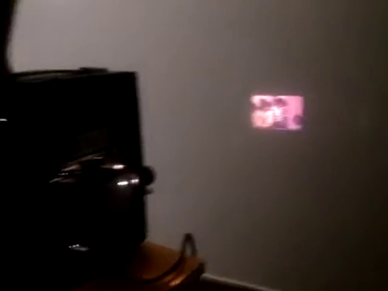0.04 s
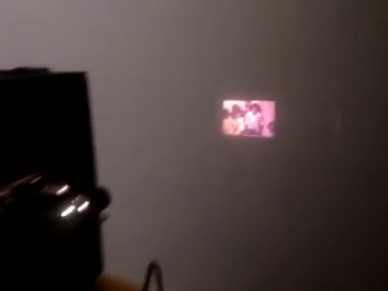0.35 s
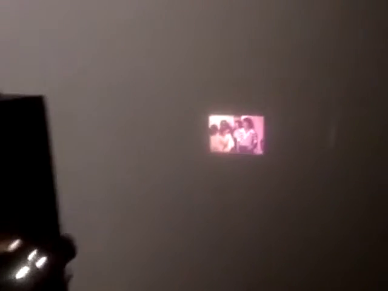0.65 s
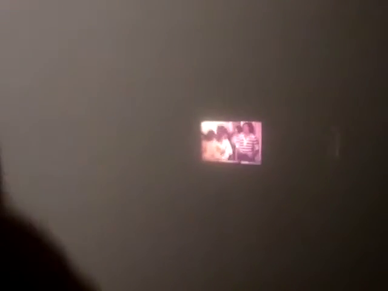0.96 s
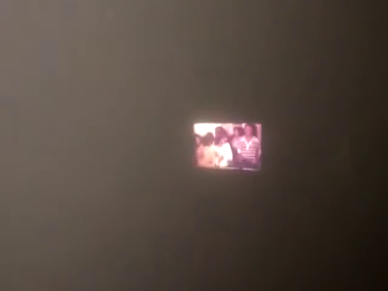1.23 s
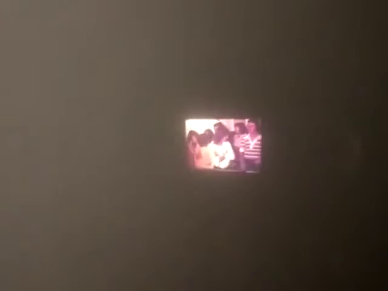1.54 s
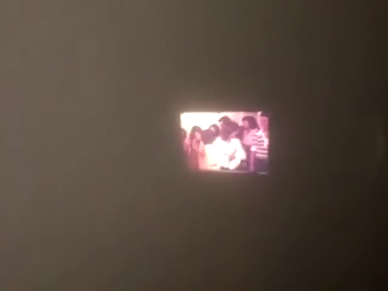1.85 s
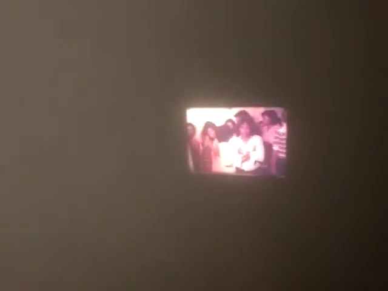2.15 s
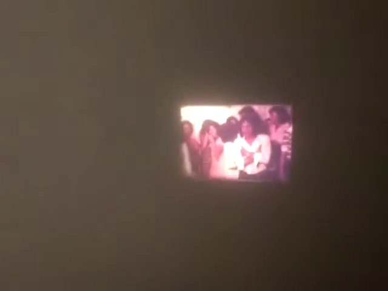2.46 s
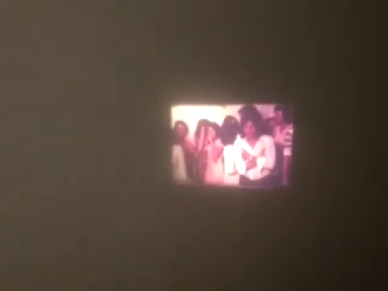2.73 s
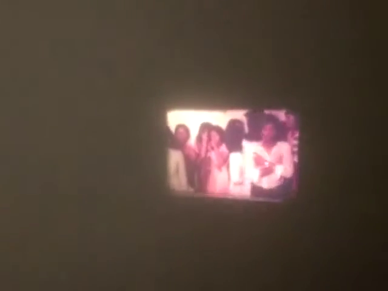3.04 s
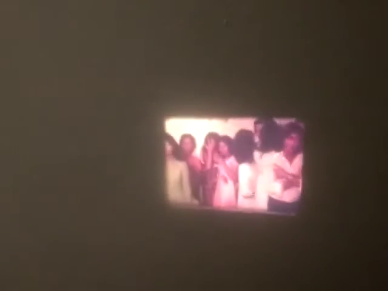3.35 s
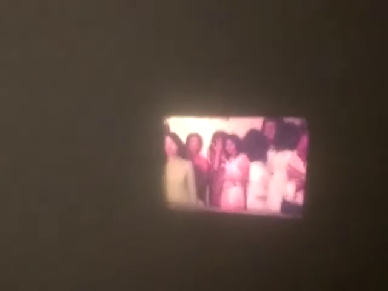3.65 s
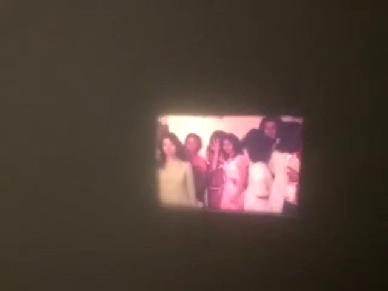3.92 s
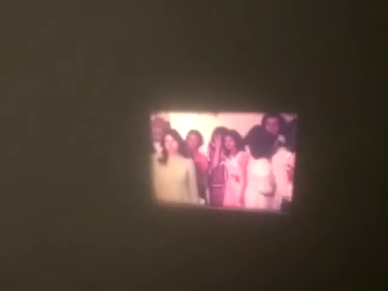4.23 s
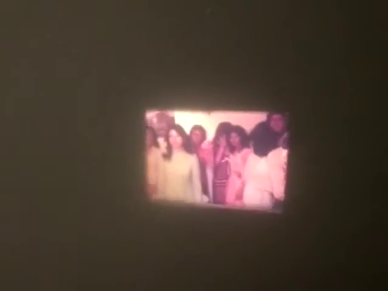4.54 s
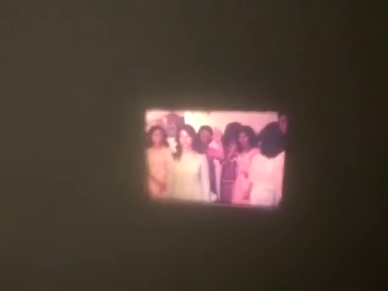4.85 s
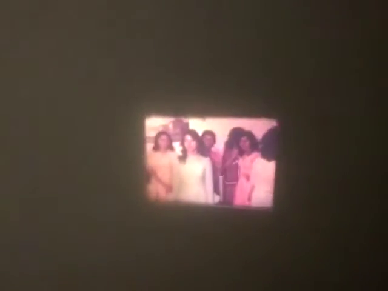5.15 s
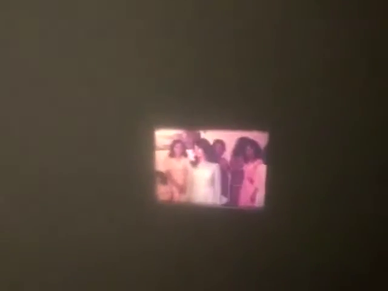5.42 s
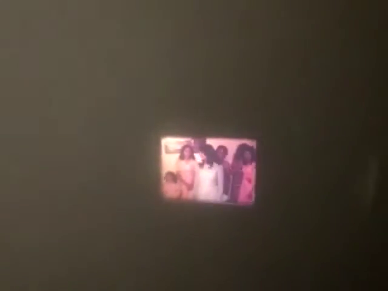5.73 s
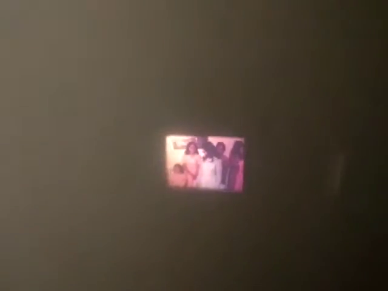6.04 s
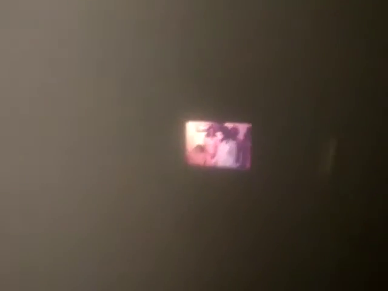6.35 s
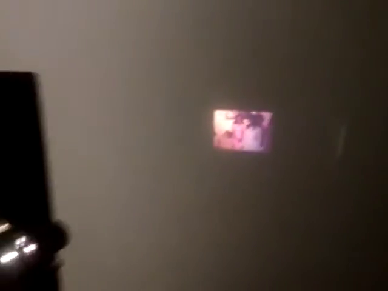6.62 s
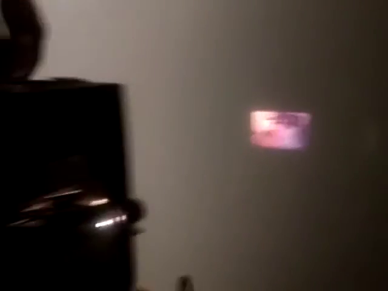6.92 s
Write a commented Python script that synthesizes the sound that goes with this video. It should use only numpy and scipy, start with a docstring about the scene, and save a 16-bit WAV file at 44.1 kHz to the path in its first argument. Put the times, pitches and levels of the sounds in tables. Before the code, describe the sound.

Rapid, regular clicking comes from an old film projector, together with fan whirr, motor drone and the crackling hiss of moving film. Now and then a perforation catches with a crisp tick. Past the middle, a reel squeals thinly and briefly. It is heard indoors through a hand-held stereo microphone that starts beside the machine, wanders off and returns, with faint dull handling thumps.

```python
"""A dark room: a small film projector runs, heard from a hand-held stereo microphone that drifts away
from it and back. The cooling fan whirrs and sings, the motor hums, the film rustles through the gate.
The claw pulls the film down some 19 times a second: each pull is a run of small contacts and a knock
that rings the housing. Now and then the claw snaps on a perforation. Two faint squeals pass, and
the hand bumps the microphone."""
import sys
import numpy as np
from scipy import signal
from scipy.fft import rfft, irfft
from scipy.io import wavfile
from scipy.ndimage import map_coordinates

SR = 44100
rng = np.random.default_rng(int(sys.argv[2]) if len(sys.argv) > 2 else 0)


def to_wav(sig):
    """Store sig (one row per channel, or 1-D mono) as 16-bit WAV at the path in sys.argv[1].

    Samples outside -1..1 are clipped; the rate is SR.
    """
    pcm = np.clip(np.atleast_2d(sig), -1, 1) * 32767
    pcm = np.round(pcm).astype(np.int16)
    wavfile.write(sys.argv[1], SR, pcm.T)  # frames by channels


N = 312228
TIME = np.arange(N) / SR
BINS_HZ = np.maximum(np.arange(N // 2 + 1) * SR / N, 1)


def from_db(db):
    """Decibels to gain."""
    return 10 ** (np.asarray(db) / 20)


def unit_rms(x):
    """Scale to rms 1."""
    return x / np.sqrt(np.mean(x ** 2) + 1e-20)


def curves(rows, at=TIME):
    """Interpolate each later column linearly against the first."""
    knots, *columns = np.transpose(rows)
    return [np.interp(at, knots, column) for column in columns]


def response(colour):
    """Gain per FFT bin from rows of freq_hz, gain_db."""
    hz, db = np.transpose(colour)
    return from_db(np.interp(np.log(BINS_HZ), np.log(hz), db))


def equalised(x, colour):
    """Filter by a gain curve."""
    return irfft(rfft(x) * response(colour), N)


def coloured(x, colour):
    """Filter by a gain curve, keeping the power of white noise."""
    return irfft(rfft(x) * unit_rms(response(colour)), N)


def resonance(x, hz, q):
    """One resonant band-pass."""
    return signal.lfilter(*signal.iirpeak(hz, q, fs=SR), x)


def noise():
    """Two channels of white noise."""
    return rng.standard_normal((2, N))


def drift(rate_hz):
    """Smooth random wander, rms 1."""
    return unit_rms(irfft(rfft(rng.standard_normal(N)) / (1 + (BINS_HZ / rate_hz) ** 2), N))


def impulses(times, sizes):
    """One impulse of the given size at each time."""
    inside = (times >= 0) & (times < (N - 1) / SR)
    return np.bincount((times[inside] * SR).astype(int), sizes[inside], N)


def decay(power, ring_s):
    """Exponential tail on impulses of power; amplitude falls to 1/e in ring_s."""
    return signal.lfilter([1], [1, -np.exp(-2 / (ring_s * SR))], power + 1e-18)


def mode(strikes, hz, t60_s):
    """A struck, decaying mode."""
    radius = np.exp(-np.log(1000) / (t60_s * SR))
    angle = 2 * np.pi * hz / SR
    return signal.lfilter([0, np.sin(angle)], [1, -2 * radius * np.cos(angle), radius ** 2], strikes + 1e-18)


# microphone ports: freq_hz, left_minus_right_db, left_lead_rad, coherence
PORTS = [(60, 1.1, -2.5, .8), (150, 1.2, -2.6, .55), (300, 2.2, -1, .55), (650, 3.2, 0, .83),
         (1150, 0, 0, .93), (1450, 0, .4, .3), (1700, 0, 2.8, .7), (2000, 0, 3.1, .99),
         (2250, 0, 3.17, .996), (2500, 0, 2.4, .45), (2800, 0, .2, .7), (3400, -1, -.2, .84),
         (3800, -.8, -1.6, .5), (4300, -.8, -3.1, .84), (4800, .4, -4, .3), (5100, 1.1, -6.4, .5),
         (5700, 2.1, -6, .6), (6500, 4.5, -3.2, .68), (8700, 12.3, 3, .47), (11000, 13.6, 9, .1),
         (15000, 12.6, 20, .05)]
def ports(pair):
    """The right port hears part of the left port's sound, shifted in phase, and part of its own."""
    balance_db, lead_rad, coherence = curves(PORTS, BINS_HZ)
    shared, own = rfft(pair)
    blend = coherence * shared + np.sqrt(1 - coherence ** 2) * own
    right = blend * from_db(-balance_db) * np.exp(-1j * lead_rad)
    return np.array([pair[0], irfft(right, N)])


# room resonances: freq_hz, centre_place, reach_place, gain_db
ROOM_PEAKS = [(302, 0.28, 0.086, 4.5), (310, 0.92, 0.041, 1), (690, 0.88, 0.22, 1), (814, 0.88, 0.41, 2),
              (866, 0.56, 0.061, 1.5), (1600, 0.43, 0.093, -0.5)]
def room_peaks(x, place, q=11.5):
    """Each room resonance takes effect as the microphone nears its place."""
    return x + sum((from_db(db * np.exp(-((place - centre) / reach) ** 2)) - 1) * resonance(x, hz, q)
                   for hz, centre, reach, db in ROOM_PEAKS)


def table_echo(x, place, near_s=0.000865, far_s=0.0024, echo_db=-23):
    """A reflection off the table combs the treble; the comb slides as the microphone moves."""
    delay_s = near_s + (far_s - near_s) * place
    echo = np.array([map_coordinates(side, [(TIME - delay_s) * SR], order=3) for side in x])
    return (x + from_db(echo_db) * echo) / np.sqrt(1 + from_db(echo_db) ** 2)


# hand bumps: start_s, level_db
BUMPS = [(.13, -46), (0.191, -49), (.26, -45), (2.78, -51), (4.325, -51), (5.08, -52), (5.349, -49),
         (5.84, -49), (6.481, -48)]
def handling(pitch_hz=62, t60_s=0.38, gain_db=3):
    """Dull thumps through the body of the microphone."""
    start_s, db = np.transpose(BUMPS)
    thumps = mode(impulses(start_s, from_db(db + gain_db)), pitch_hz, t60_s)
    return signal.sosfilt(signal.butter(2, [48, 90], "band", fs=SR, output="sos"), thumps)


# one glide per squeal: time_s, pitch_hz, level_db
SQUEALS = [
    [(5.1, 950, -44), (5.2, 958, -39), (5.29, 964, -34), (5.36, 972, -43), (5.42, 984, -37),
     (5.5, 1005, -52)],
    [(5.2, 596, -35), (5.31, 602, -42), (5.45, 604, -33.5), (5.56, 600, -37.5), (5.75, 599, -48),
     (5.95, 586, -42)],
]
def squeals(waver_hz=7, gain_db=-3):
    """Thin, unsteady tones, as from a rubbing reel."""
    out = np.zeros(N)
    for glide in SQUEALS:
        hz, db = curves(glide)
        sounding = (TIME > glide[0][0]) & (TIME < glide[-1][0])
        phase = 2 * np.pi * np.cumsum(hz + waver_hz * drift(22)) / SR
        out += sounding * np.sqrt(2) * from_db(db + gain_db) * np.sin(phase)
    return out


# motor and gear drone: freq_hz, density_db
DRONE_COLOUR = [(25, -34), (42, -40), (58, -2.5), (80, -3), (110, 1), (150, -4.5), (195, 6.5), (240, 1),
                (400, -33)]
def motor(rumble_db=4, hum_hz=119.2, hum_db=-9, sway_db=2.5, right_db=-7):
    """The drive rumbles through the table, with mains hum in it."""
    hum = np.sqrt(2) * from_db(hum_db + sway_db * drift(5.1)) * np.sin(2 * np.pi * hum_hz * TIME)
    rumble = from_db(rumble_db) * ports(coloured(noise(), DRONE_COLOUR))
    return rumble + np.array([hum, from_db(right_db) * hum])


# blade tone in the standing waves: time_s, left_db, right_db
FAN_LEVEL = [(0, -36, -34), (.25, -35, -34), (.6, -41.5, -38.5), (.87, -37.5, -40), (1.1, -42, -46),
             (1.4, -34, -43), (1.85, -34, -40), (2.35, -36, -44), (2.75, -42.5, -48), (3.5, -37, -60),
             (3.75, -43, -57), (4.15, -38.5, -60), (4.5, -44.5, -56), (4.95, -36, -52), (5.3, -42.5, -53),
             (5.6, -34.5, -43), (6, -33.5, -43), (6.5, -34, -39.5), (6.8, -37.5, -37), (7.08, -38, -36)]
def fan(octave_db, blade_hz=220, waver_hz=0.62, lead_rad=1.59, sway_db=1.2, throb_db=3.5, fourth_db=-10):
    """Blade-pass tone and throbbing overtones; standing waves make the tone differ at the two ports."""
    phase = 2 * np.pi * np.cumsum(blade_hz + waver_hz * drift(7.7)) / SR
    blade = from_db(np.array(curves(FAN_LEVEL)) + sway_db * drift(3.9)) * np.sin([phase, phase + lead_rad])
    overtones = np.sin(2 * phase) + from_db(fourth_db) * np.sin(4 * phase)
    throb = from_db(octave_db + throb_db * drift(16))
    return np.sqrt(2) * (blade + throb * overtones)


# air and gear noise: freq_hz, density_db
WHIRR_COLOUR = [(40, -53), (140, -16.5), (200, 0), (245, -3.5), (320, 0), (480, -1), (700, -2.5), (920, -5),
                (1070, -3), (1350, -11), (1650, -18.5), (2200, -29.5)]
def whirr(pulls, gain_db=-1, load_db=-0.5, load_s=0.033):
    """Fan air and gear rumble, dipping slightly under the load of each pull."""
    load = decay(impulses(pulls, np.ones(len(pulls))), load_s)
    return from_db(gain_db + load_db * unit_rms(load - load.mean())) * coloured(noise(), WHIRR_COLOUR)


# film on its guides: centre_s, half_width_s, freq_hz, level_db
BRUSHES = [(0.906, 0.036, 7600, -37), (0.633, 0.18, 8000, -48), (3.885, 0.11, 3160, -50),
           (4, 0.085, 3200, -46), (5.9, 0.39, 12700, -55), (6.327, .04, 12500, -41)]
def brushes(q=4):
    """The film brushes its guides: short swells of hiss, each through one resonance."""
    out = np.zeros((2, N))
    for centre_s, half_width_s, hz, db in BRUSHES:
        swell = np.exp(-((TIME - centre_s) / half_width_s) ** 2)
        out += from_db(db) * swell * unit_rms(resonance(noise(), hz, q))
    return out


# film rustle: freq_hz, density_db
RUSTLE_COLOUR = [(1000, -9), (1400, -4), (1650, 5), (2150, 0), (2800, 0.5), (4000, 4), (5200, 0.5),
                 (6400, -2.5), (8200, -0.5), (10000, -7.5), (12000, -16), (15000, -26)]
# rustle level, also followed by metal and clatter: time_s, level_db
TREBLE_LEVEL = [(0.0, -37.5), (0.39, -38), (0.61, -42), (0.93, -39), (0.97, -42.5), (1.24, -42),
                (1.46, -37.5), (2.13, -36), (2.58, -39.5), (3.04, -39.5), (3.43, -36), (3.59, -38),
                (3.615, -40), (3.8, -41.5), (4.14, -38.5), (4.31, -39), (4.34, -41.5), (4.55, -39.5),
                (4.73, -38), (5.3, -39), (5.7, -36.5), (6.43, -35.5), (6.8, -38), (6.9, -40), (7.08, -38.5)]
USUAL_TREBLE_DB = -38
def film(treble_db, gain_db=0.6, flutter_db=2.5, crackles_per_s=55, crackle_s=0.00036, spread_db=1):
    """The film hisses through the gate; its loops crackle at random."""
    sizes = from_db(spread_db * np.minimum(rng.exponential(1, N), 4))
    onsets = rng.random(N) < crackles_per_s / SR
    crackles = decay(onsets * sizes ** 2, crackle_s)
    envelope = from_db(treble_db + gain_db + flutter_db * drift(71)) * np.sqrt(1 + crackles)
    return coloured(envelope * noise(), [(300, -45)] + list(RUSTLE_COLOUR))


# drive knocks per frame: delay_s, freq_hz, level_db, ring_s
KNOCKS = [(-.003, 1080, -16, 0.0046), (.004, 316.5, -10, 0.015), (0.026, 340, -10.5, .008)]
def knocks(pulls, q=3, uneven_db=3.6):
    """The drive knocks dully on each of its parts once a frame."""
    out = np.zeros((2, N))
    for delay_s, hz, db, ring_s in KNOCKS:
        sizes = from_db(uneven_db * rng.standard_normal(len(pulls)))
        bursts = np.sqrt(decay(impulses(pulls + delay_s, sizes ** 2), ring_s)) * noise()
        out += from_db(db) * unit_rms(resonance(resonance(bursts, hz, q), hz, q))
    return out


# case thumps per pull: delay_s, level_db, ring_s
THUDS = [(.003, -1.5, 0.0034), (.0098, 2, 0.012)]
# hollow throb: time_s, level_re_whirr_db
THUD_LEVEL = [(0, -6), (.7, -5), (1.4, -11), (2, -18), (2.9, -12.5), (3.4, -2), (3.75, -7), (4.15, -6),
              (4.7, -4), (5.3, -7.5), (6.1, -18), (6.7, -9), (7.08, -2)]
def thuds(pulls, hollow_hz=685, q=8, uneven_db=1):
    """The hollow of the case throbs twice a pull, as the film starts and stops."""
    power = np.zeros(N)
    for delay_s, db, ring_s in THUDS:
        sizes = from_db(db + uneven_db * rng.standard_normal(len(pulls)))
        power += decay(impulses(pulls + delay_s, sizes ** 2), ring_s)
    hollow = resonance(np.sqrt(power) * noise(), hollow_hz, q)
    return from_db(curves(THUD_LEVEL)[0]) * unit_rms(equalised(hollow, [(1100, 11), (2000, -33)]))


# housing modes: pitch_hz, level_db, t60_s
HOUSING_MODES = [(276, -17.5, 0.71), (289, -18.5, 0.78), (305.4, -34.5, 0.28), (329.3, -13, 0.4),
                 (351.5, -22.5, 1), (386, -22.5, 0.52), (522.4, -14.5, 0.2), (562, -14, 0.44),
                 (635, -21, 0.43), (656, -12.5, 0.61), (699, -14.5, 0.33), (736, -25.5, 1),
                 (756, -20, 0.27), (806, -21.5, 0.48), (840, -24.5, 0.7), (866, -15.5, 0.9),
                 (885.4, -18, 0.44), (954, -22, .3), (1034, -26.5, 0.31), (1068, -17, 0.6),
                 (1106, -18.5, 0.92), (1208, -18, 0.39), (1218, -21.5, 0.76), (1382, -23, 0.16),
                 (1658, -22, 0.15)]
def housing(pulls, gain_db=-1, uneven_db=4, delay_s=0.002065, jitter_s=0.00008, sway_db=1.8):
    """Each pull knocks the case; its modes ring into the next and sing multiples of the frame rate."""
    out = np.zeros((2, N))
    for hz, db, t60_s in HOUSING_MODES:
        late, *forces = rng.standard_normal((len(pulls), 3)).T
        sway = unit_rms(signal.lfilter([1], [1, -0.8], rng.standard_normal(len(pulls))))
        start_s = pulls + delay_s + jitter_s * late
        blows = [impulses(start_s, from_db(uneven_db * force + sway_db * sway)) for force in forces]
        out += from_db(db + gain_db) * unit_rms(mode(np.array(blows), hz, t60_s))
    return out


# gate metal modes: pitch_hz, level_db, t60_s
METAL_MODES = [(3260, -45.5, 0.054), (3610, -43.5, 0.033), (4170, -49, 0.035), (5160, -47, 0.018),
               (8660, -40, .03)]
def metal(pulls, uneven_db=3):
    """Each claw strike rings the thin metal parts of the gate."""
    out = np.zeros((2, N))
    for hz, db, t60_s in METAL_MODES:
        forces = rng.standard_normal((2, len(pulls)))
        strikes = [impulses(pulls, from_db(uneven_db * force)) for force in forces]
        out += from_db(db) * unit_rms(mode(np.array(strikes), hz, t60_s))
    return out


# perforation snaps, stray film ticks: start_s, level_db
SNAPS = [(.3755, -25), (0.4269, -15), (0.5301, -14), (0.5813, -14.5), (0.6325, -18), (0.6846, -12.5),
         (0.9427, -13.5), (1.0458, -13.5), (1.0974, -18), (1.2003, -18), (1.4582, -17), (1.6925, -11),
         (1.951, -14), (2.0535, -23), (2.105, -24), (2.1565, -16), (2.2092, -11), (2.3122, -14),
         (2.3637, -21), (2.4668, -16), (2.7241, -13.5), (2.93, -14), (2.9819, -17), (3.0335, -15),
         (3.4453, -14), (3.4974, -14.5), (3.6003, -11), (3.6519, -20), (3.7034, -20), (3.7549, -19),
         (4.0644, -16), (4.1162, -16), (4.2192, -19), (4.3222, -11), (4.5795, -13.5), (4.734, -18),
         (4.837, -23), (4.992, -21), (5.095, -17), (5.198, -24), (5.5098, -15), (5.6128, -14),
         (5.7176, -14), (5.7672, -17.5), (6.5425, -26), (6.5935, -19), (6.6448, -19.5), (6.7479, -16.5),
         (6.851, -16.5), (7.0058, -21.5)]
TICKS = [(0.8512, -21.5), (0.8633, -24), (0.9009, -33), (0.9089, -25), (0.9141, -22), (0.9553, -24),
         (1.3175, -23), (1.9197, -36), (2.1817, -20), (2.2186, -22), (2.4365, -22), (2.6352, -24),
         (2.7395, -20.5), (2.8433, -20), (2.9441, -23), (2.996, -28), (5.4205, -18.5), (5.4256, -31),
         (5.472, -20), (5.4786, -23), (5.8454, -21), (6.1487, -22), (6.2019, -24)]
# spectrum of both: freq_hz, density_db
SNAP_COLOUR = [(300, -9), (900, -26), (2100, 5.5), (3000, 2.5), (4200, -0.5), (6000, 3.5), (7700, 10),
               (10000, 6.5), (12000, -9.5), (15000, -15)]
def snaps(near, snap_db=-3.5, snap_s=0.0012, tick_db=-1, tick_s=0.0024, ping_hz=7700, ping_db=4.5):
    """The claw catches a perforation or the running film ticks; close by, each crack has a thin ping."""
    power = np.zeros(N)
    for events, gain_db, ring_s in ((SNAPS, snap_db, snap_s), (TICKS, tick_db, tick_s)):
        start_s, db = np.transpose(events)
        power += decay(impulses(start_s, from_db(db + gain_db) ** 2), ring_s)
    cracks = coloured(np.sqrt(power) * rng.choice([-1, 1], (2, N)), SNAP_COLOUR)
    return cracks + near * from_db(ping_db) * resonance(cracks, ping_hz, q=9)


# claw timing wander: time_s, late_s
LATENESS = [(0, -0.00077), (.6, -.0003), (1.5, 0.000085), (2.3, 0.00057), (2.7, 0.0012), (3.3, -0.00034),
            (3.7, -0.00069), (5.2, 0), (5.6, -0.00061), (6.3, -0.00047), (7.08, -0.00053)]
def claw_times(first_s=0.0149, frame_s=0.05153, slowing_s_per_frame=7e-7, cut_at_s=1.64, cut_s=0.0236):
    """Pull-down times: an even beat that slows slightly and wanders."""
    frame = np.arange(int(N / SR / frame_s) + 1)
    beat_s = first_s + frame * (frame_s + slowing_s_per_frame * frame / 2)
    early_s = cut_s * (beat_s > cut_at_s)  # a tiny cut in the sound brings later clicks 24 ms early
    return beat_s - early_s + curves(LATENESS, beat_s)[0]


def gate_ring(pulls, repeat_share=0.2):
    """Dense ringing of the gate, partly the same after every pull, partly new; rms 1."""
    starts = np.concatenate([[0], (pulls * SR).astype(int)])
    since_pull = np.arange(N) - starts[np.searchsorted(starts, np.arange(N), "right") - 1]
    same, new = rng.choice([-1, 1], (2, 2, N))
    return np.sqrt(repeat_share) * same[:, since_pull] + np.sqrt(1 - repeat_share) * new


# contacts per pull: delay_s, level_db, ring_s, jitter_s, glint_db
CONTACTS = [(-.0051, -5, 0.0012, .0003, -22), (-.0042, -6, 0.001, .0003, -22),
            (0, 3.5, 0.0007, 0.00009, -10), (.0008, 1.5, 0.0014, 0.00017, -10),
            (.0018, -1, 0.0018, .0003, -8), (.0033, -4.5, 0.003, 0.00045, -6.5),
            (0.0145, -13, .0025, .001, -6), (.0202, -12.5, 0.002, .001, -9),
            (0.0219, -10.5, 0.0035, 0.00045, -8), (0.0257, -19, 0.0012, 0.0007, -6)]
# contact spectrum: freq_hz, density_db
CLICK_COLOUR = [(800, 0.5), (1600, -14), (2200, -6), (3000, 0.5), (4000, 1), (5300, 0.5), (6400, -4.5),
                (8000, 0.5), (10000, -1.5), (12000, -12.5), (15000, -16)]
def clatter(pulls, near, base_db=-23.5, treble_follow=0.87, uneven_db=-0.05, room_db=-15, room_s=0.014,
            flicker_db=1.5, shade_db=-6):
    """Each claw contact is a short bright burst from the gate; the walls return a duller, longer wash."""
    strength_db = base_db + treble_follow * (curves(TREBLE_LEVEL, pulls)[0] - USUAL_TREBLE_DB)
    power, glint_power = np.zeros((2, N))
    for delay_s, db, ring_s, jitter_s, glint_db in CONTACTS:
        late, force = rng.standard_normal((len(pulls), 2)).T
        sizes = from_db(strength_db + db + uneven_db * force)
        contact = decay(impulses(pulls + delay_s + jitter_s * late, sizes ** 2), ring_s)
        power += contact
        glint_power += contact * from_db(glint_db) ** 2
    bursts = coloured(np.sqrt(power) * gate_ring(pulls), CLICK_COLOUR)
    # hard contacts glint at the top; close by, the case shades this
    glint = np.sqrt(glint_power) * from_db(shade_db * near + flicker_db * drift(21)) * noise()
    bursts += coloured(glint, [(6000, -8), (10200, 10), (12000, 6.5), (15000, -7)])
    wash = from_db(room_db) * np.sqrt(decay(power, room_s) / (0.0015 * SR)) * noise()
    low_cut = signal.butter(2, 500, "high", fs=SR, output="sos")  # small parts radiate no bass
    return signal.sosfilt(low_cut, bursts + coloured(wash, RUSTLE_COLOUR))


# microphone path: time_s, place (0 at the projector, 1 near the picture on the wall)
WALK = [(0, 0.099), (.7, 0.048), (1.4, 0.18), (2.2, 0.45), (3.5, 0.94), (4.8, 0.71), (5.3, 0.68),
        (5.9, 0.3), (6.6, 0.028), (7.08, 0.088)]
# standing waves: place, fan_octave_re_whirr_db, motor_re_whirr_db, lows_left_minus_right_db
STANDING_WAVES = [(0, -12.5, -20, -6.5), (.15, -10, -15.5, 4), (.4, -16, -10.5, 4.5), (.7, -15.5, -16, 3.5),
                  (1, -17, -15, 1.5)]
# shared level of whirr, case, fan overtones and motor: time_s, level_db
WHIRR_LEVEL = [(0.0, -32), (0.41, -32), (0.45, -34.5), (.7, -35), (0.93, -32.5), (0.96, -37.5), (1.1, -38),
               (1.58, -33), (2.2, -33), (2.5, -34.5), (3.1, -34), (3.35, -32), (3.59, -33), (3.615, -37),
               (3.8, -36.5), (4.1, -32.5), (4.31, -32.5), (4.335, -36), (4.7, -33), (5.15, -32.5),
               (5.66, -31.5), (6.82, -32.5), (6.87, -37), (7.08, -33)]
# the highest hiss and clicks brighten and dull: time_s, gain_db
TOP_LEVEL = [(0, -2.5), (.35, 3.5), (.7, 0.5), (1.2, 3), (1.6, -1.5), (2, 1.5), (2.6, 0.5), (3.1, 0.5),
             (3.55, 0.5), (3.8, 0), (4.1, 3), (4.55, 1), (5, 3), (5.3, 1), (5.7, 3.5), (6.15, 1), (6.55, 1),
             (6.9, 3.5), (7.08, -6)]
# colour beside the projector and further into the room: freq_hz, gain_db
NEAR_COLOUR = [(150, 2.5), (330, -3.5), (520, -2.5), (720, 1), (1100, -0.5), (1550, 3), (2300, -1),
               (3600, 2), (5500, -1.5), (8000, 0.5), (12000, -2), (15000, -2)]
FAR_COLOUR = [(300, -2), (750, -1), (1200, -2), (2600, 3.5), (3500, -2), (4400, -2.5), (5500, 1), (7500, 1),
              (10500, -1), (14000, 1.5)]
def scene(body_db=-0.5, tones_db=0.23, metal_db=-3, near_reach=0.17, top_hz=11000):
    """The projector at the two ports; balance and colour follow the microphone's place."""
    whirr_db = curves(WHIRR_LEVEL)[0]
    treble_db = curves(TREBLE_LEVEL)[0]
    place = curves(WALK)[0]
    near = np.exp(-place / near_reach)
    octave_db, motor_db, pan_db = curves(STANDING_WAVES, place)
    pulls = claw_times()

    case = whirr(pulls) + housing(pulls) + thuds(pulls) + knocks(pulls)
    body = from_db(whirr_db + body_db) * ports(room_peaks(case, place))
    # only long waves swing sideways with the standing waves
    lows = equalised(body, [(750, 0), (1100, -20), (1500, -19)])
    body += (from_db([pan_db / 2, -pan_db / 2]) - 1) * lows

    ringing = near * from_db(metal_db + treble_db - USUAL_TREBLE_DB) * metal(pulls)
    transport = clatter(pulls, near) + brushes() + film(treble_db)
    gate = ports(table_echo(transport, place) + ringing + snaps(near))
    top = equalised(gate, [(top_hz / 2, -30), (top_hz, 0)])
    gate += (from_db(curves(TOP_LEVEL)[0]) - 1) * top

    machine = (1 - near) * equalised(body + gate, FAR_COLOUR) + near * equalised(body + gate, NEAR_COLOUR)
    tones = fan(whirr_db + tones_db + octave_db) + from_db(whirr_db + tones_db + motor_db) * motor()
    return machine + tones + squeals() + handling()


def record(dry, cutoff_hz=15900):
    """Steep low-pass."""
    return signal.sosfilt(signal.ellip(10, 0.1, 80, cutoff_hz, fs=SR, output="sos"), dry)


dry = scene()
out = record(dry)
to_wav(out)
```